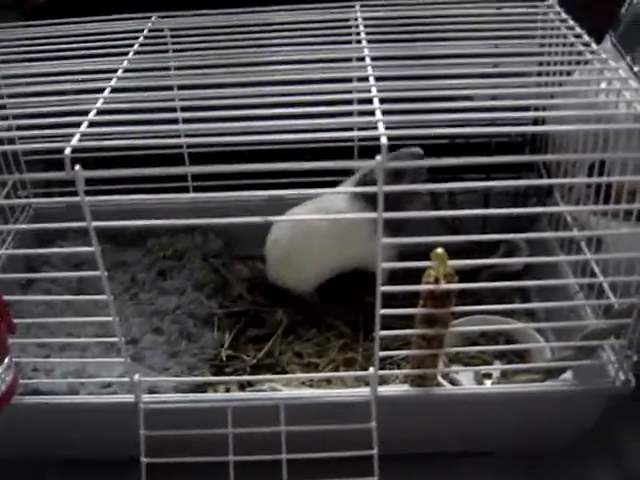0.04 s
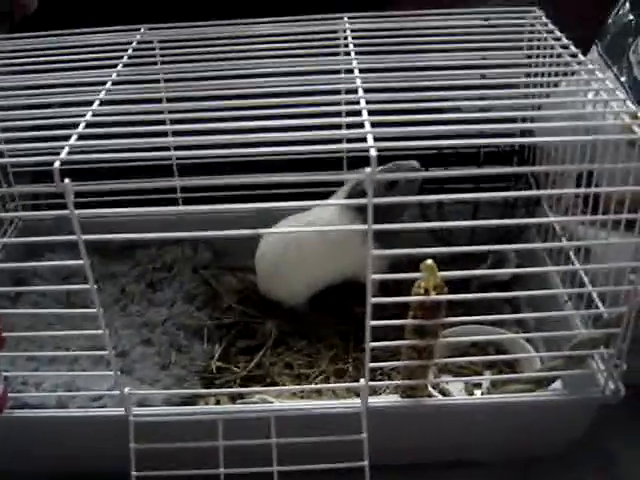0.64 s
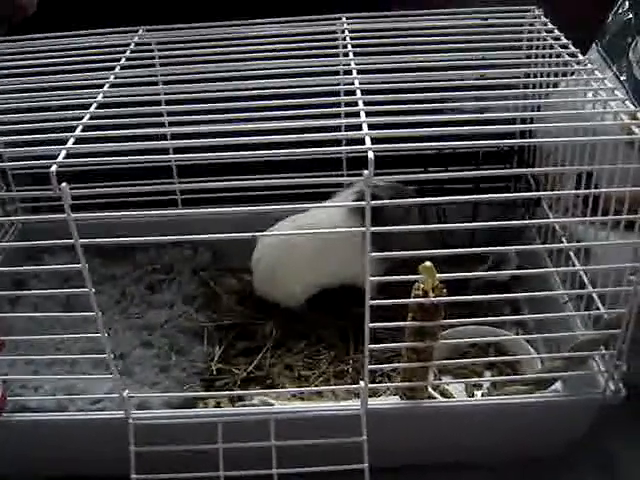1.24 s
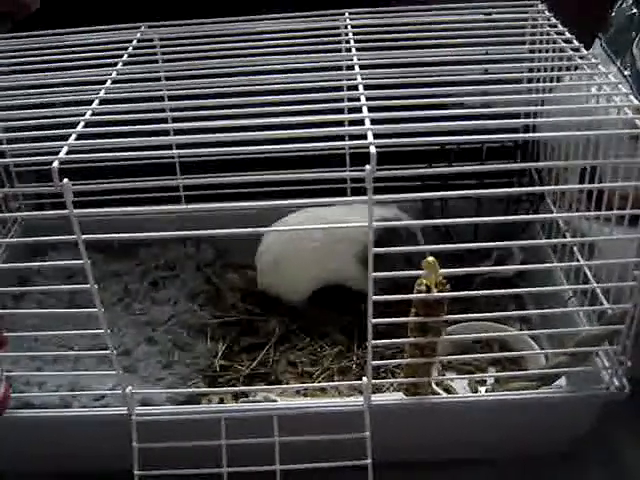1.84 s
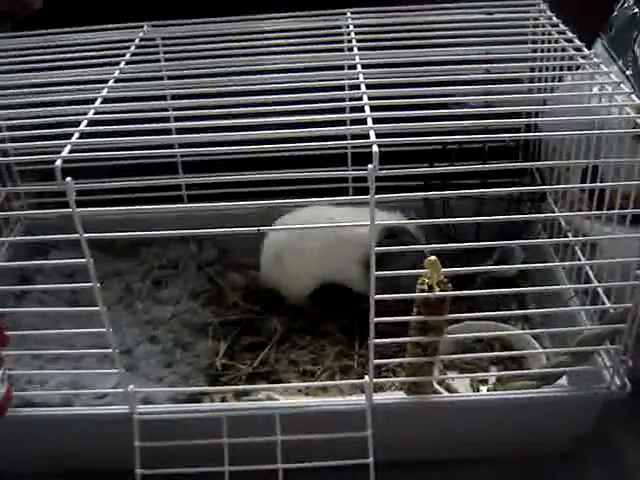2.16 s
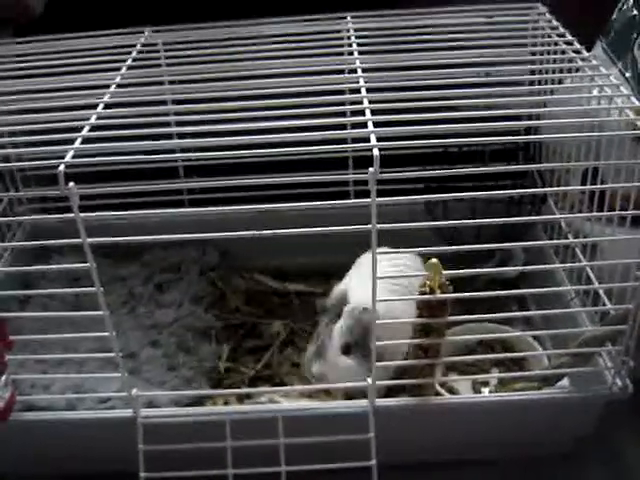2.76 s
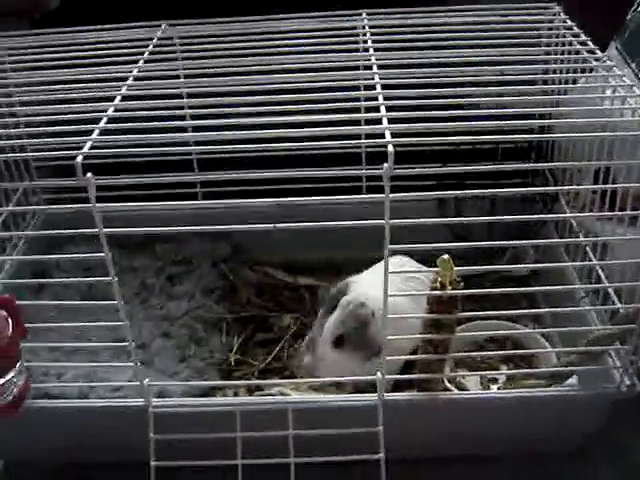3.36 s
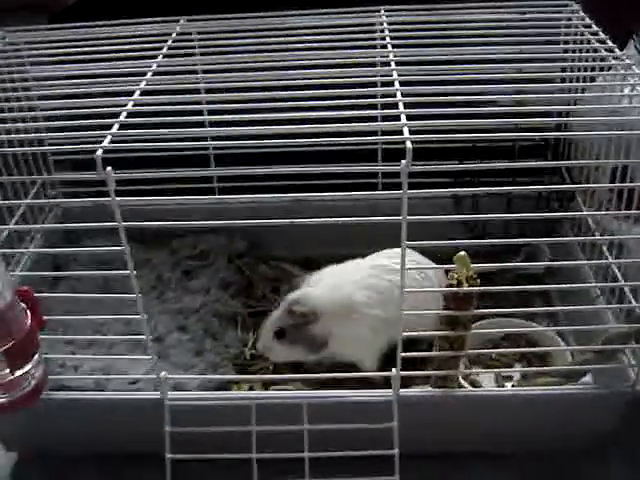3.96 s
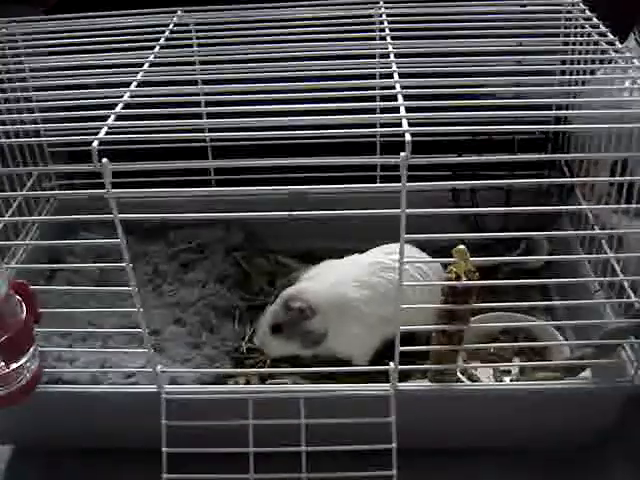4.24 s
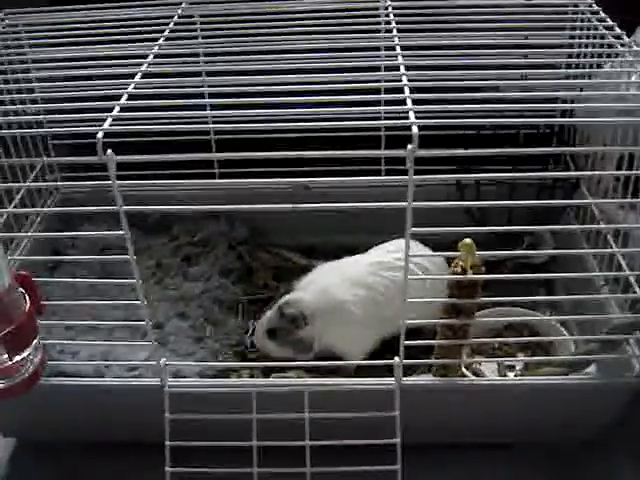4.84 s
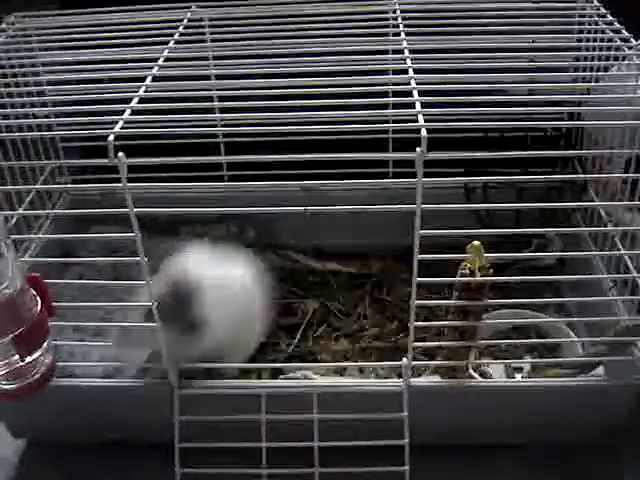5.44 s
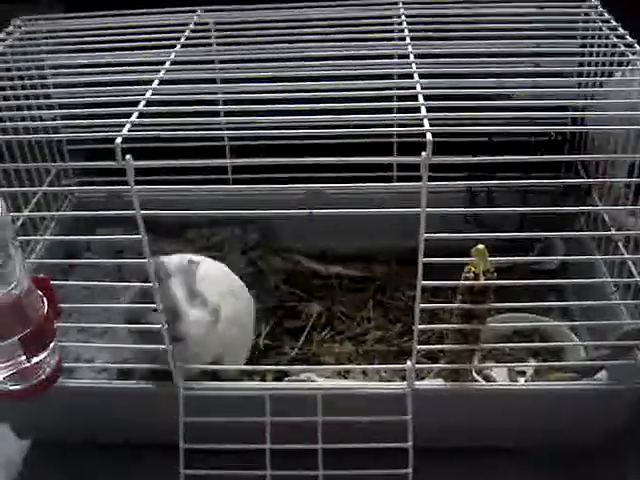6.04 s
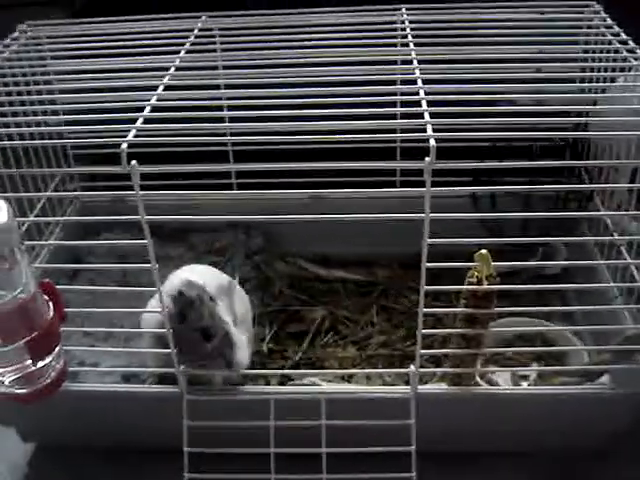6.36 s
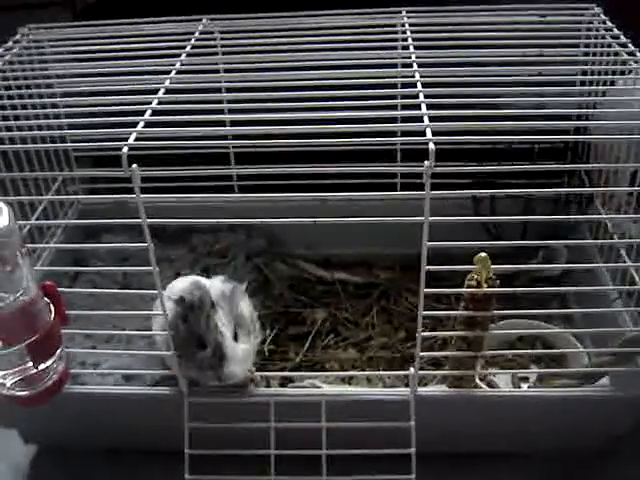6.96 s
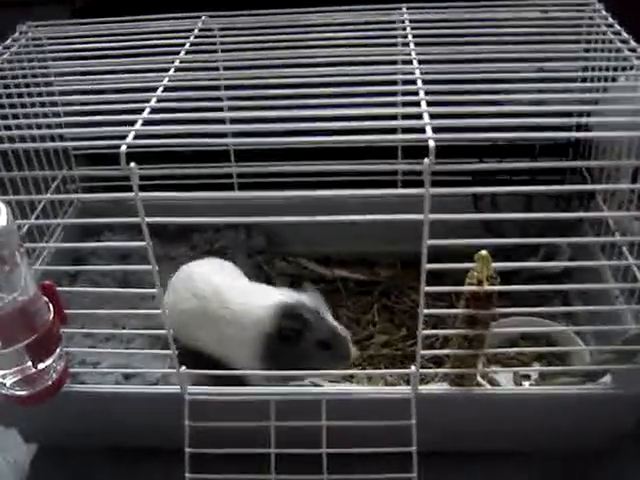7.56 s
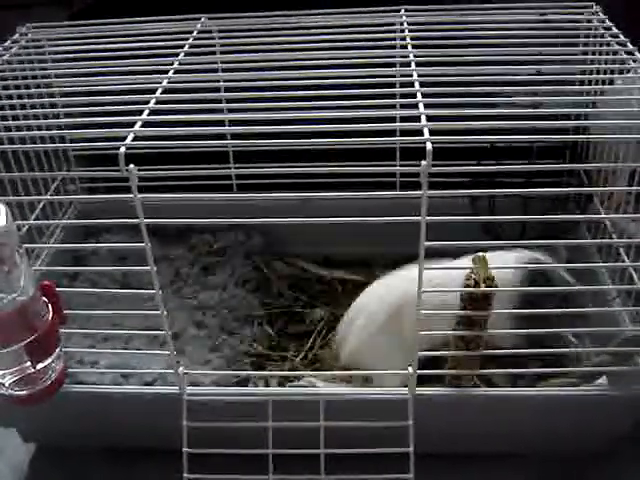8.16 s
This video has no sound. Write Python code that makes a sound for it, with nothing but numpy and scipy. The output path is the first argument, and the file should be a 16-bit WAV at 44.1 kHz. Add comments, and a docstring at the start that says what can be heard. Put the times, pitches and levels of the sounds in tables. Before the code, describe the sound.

A guinea pig chatters in its cage, giving two or three short clucks a second, many sliding up into high squeals at first. A little after two seconds it knocks sharply against the plastic tub and rustles the hay. Softer clucks follow, with a few faint stalk snaps, then a lighter bump and a quick scurry. A last squeal and scuffle come at the end. It sounds fairly close, in a small room with a steady hiss.

```python
"""A guinea pig chatters in a cage with a plastic tub, over the steady hiss of a small room.
From the start its vocal folds give clucks near 900 Hz; eager ones slide up to squeals near 3.5 kHz.
At 2.3 s it bumps the tub, which rings, and its feet rustle the hay. Softer clucks follow and a few
stalks snap. At 5.3 s comes a lighter bump and a dart across the hay; at 8 s a last squeal and scuffle."""
import sys
import numpy as np
from scipy import signal
from scipy.fft import rfft, irfft, next_fast_len
from scipy.io import wavfile

SR = 44100
rng = np.random.default_rng(int(sys.argv[2]) if len(sys.argv) > 2 else 0)


def unload_audio(sound):
    """Save the sound as a 16-bit wav file, at the path given as the first command line argument."""
    columns = np.transpose(np.atleast_2d(sound))
    # keep every value between -1 and 1, then stretch to whole-number steps
    steps = np.round(np.clip(columns, -1, 1) * 32767)
    wavfile.write(sys.argv[1], SR, steps.astype(np.int16))


N = 361619
TIME = np.arange(N) / SR


# Clucks: (start [s], length [s], opening pitch [Hz], opening level [dB], middle pitch [Hz],
# middle level [dB], overtone boost [dB], upturn length [s], upturn end pitch [Hz], upturn level [dB])
CLUCKS = [ (0.0, .02, 970, -35.5, 917, -45.5, 21, 0.0069, 900, -52),
          (0.125, 0.054, 1265, -40.5, 1004, -35.5, 4.5, 0.011, 1025, -43),
          (0.212, 0.0093, 1375, -50, 1325, -37.5, -4, 0.0056, 1350, -46),
          (0.388, 0.064, 1100, -45.5, 904, -39, 1.5, 0.077, 1963, -38.5),
          (0.789, 0.064, 1255, -38, 937, -36, 1, 0.087, 2133, -36.5),
          (1.254, 0.057, 1096, -44, 860, -38.5, 2.5, 0.041, 1604, -39.5),
          (1.635, 0.065, 1090, -47.5, 840, -36.5, -5.5, 0.028, 1152, -38),
          (2.137, .062, 1014, -40, 922, -34.5, -10, 0.026, 1470, -41.5),
          (2.417, .056, 1324, -23, 1008, -36, -3, 0.022, 1422, -24.5),
          (2.73, 0.072, 994, -44.5, 881.6, -38, 3, 0.038, 1235, -40),
          (3.164, 0.053, 968, -51, 825, -48.5, -2, 0.035, 1520, -41),
          (3.401, 0.046, 1067, -47.5, 828, -41.5, 1, 0.01, 856, -44),
          (3.761, 0.07, 911, -49, 775, -46.5, -4.5, 0.08, 1303, -48),
          (3.945, 0.027, 1150, -52, 1072, -51.5, 3, 0.0066, 1080, -48),
          (4.107, 0.073, 879, -46, 844, -42.5, -16, 0.016, 880, -60),
          (4.358, 0.056, 948, -49.5, 802, -44, -9.5, 0.036, 1261, -38),
          (4.623, 0.0555, 985, -41.5, 826, -40, -8.5, 0.0067, 850, -44),
          (4.782, 0.016, 1360, -52, 1213, -38.5, -10, 0.033, 1146, -46.5),
          (4.905, .073, 958, -50, 875, -47, -5, 0.021, 1617, -38.5),
          (5.15, 0.07, 893, -50, 840, -44, -9, 0.011, 1310, -37.5),
          (5.532, .088, 871, -43.5, 825, -38, -2.5, 0.014, 1376, -35.5),
          (5.87, 0.062, 906, -43.5, 788, -40.5, 0, 0.026, 1366, -43.5),
          (6.019, 0.046, 962, -56, 799, -47, 1, 0.073, 2200, -42),
          (6.297, 0.062, 1050, -44.5, 890, -37.5, 0, .04, 1396, -33),
          (6.523, 0.054, 854, -46.5, 893, -36, -1, 0.0063, 954, -34.5),
          (6.783, 0.05, 1010, -44.5, 868.4, -34, -1.5, 0.0048, 970, -40),
          (7.268, .049, 939, -46, 832, -43, -4, 0.015, 1400, -36),
          (7.371, 0.049, 1102, -42, 976, -41.5, -6.5, .036, 1947, -37.5),
          (7.681, 0.061, 953, -48, 903, -35.5, -4.5, 0.054, 1930, -45.5),
          (8.149, 0.043, 1100, -37, 945, -32.5, 2.5, .01, 940, -57), ]
# Squeals, one curve each: (time [s], pitch [Hz], level [dB], overtone boost [dB])
SQUEAL_CURVES = [
    [(.583, 2590, -42, 2), (.619, 3280, -28.5, -3), (.675, 3710, -29.5, 5), (.715, 3540, -39, 14)],
    [(.989, 2920, -38.5, 15), (1.01, 3140, -30, -1), (1.048, 3360, -30, -4), (1.067, 2065, -32, -4),
     (1.085, 1632, -38.5, 2.5), (1.121, 1990, -33, -2), (1.145, 3270, -31, -5), (1.163, 3180, -48, 0)],
    [(1.436, 1646, -38, 10.5), (1.451, 1825, -39, 6.5), (1.49, 2205, -39.5, -5)],
    [(1.765, 1286, -38.5, 4), (1.825, 1485, -45.5, -14), (1.835, 1900, -39, 13), (1.872, 1990, -43.5, 11),
     (1.913, 2530, -46, -10), (1.944, 2560, -46.5, 17), (1.974, 1630, -36.5, -11), (1.992, 1672, -45, 0),
     (2.01, 2460, -45, 3)],
    [(2.246, 2850, -46.5, 27), (2.268, 3590, -32, 10), (2.294, 3780, -22.5, 8), (2.322, 4000, -25.5, 12),
     (2.352, 3680, -27, 1)],
    [(2.513, 1658, -50, 3), (2.548, 1710, -36, 14), (2.569, 2790, -41, 1), (2.584, 3163, -25.5, 1),
     (2.612, 3460, -27.5, 3), (2.644, 3360, -31, 3)],
    [(2.95, 1293, -40.5, 1.5), (2.99, 1274, -37, -4)],
    [(4.469, 1705, -54, -9), (4.493, 1560, -38.5, -7)],
    [(5.26, 1207, -37, -6)],
    [(5.656, 1402, -31.5, 1), (5.707, 1586, -32, -13.5), (5.722, 1915, -35.5, -2)],
    [(7.495, 2405, -51.5, 7), (7.54, 2380, -44, 4), (7.548, 2720, -39, -8), (7.565, 2670, -38, -6)],
    [(7.835, 2335, -48.5, 2), (7.909, 2810, -45.5, -4), (7.96, 2560, -50.5, 7), (7.99, 2960, -44, -2),
     (8.014, 3240, -32, -4), (8.032, 3694, -25, -4), (8.085, 3920, -35, -4)],
]

def calls():
    """One contour per call; a squeal continues the cluck begun just before it."""
    contours = [cluck_contour(*row) for row in CLUCKS]
    starts = [row[0] for row in CLUCKS]
    for squeal in SQUEAL_CURVES:
        k = np.searchsorted(starts, squeal[0][0]) - 1
        contours[k] = np.vstack([contours[k], squeal])
    return [rows[np.argsort(rows[:, 0])] for rows in contours]


def cluck_contour(start_s, length_s, opening_hz, opening_db, mid_hz, mid_db, boost_db,
                  turn_s, end_hz, turn_db, sag_share=.6, lift_share=.0509):
    """Pitch sags, lifts, turns up: (time [s], pitch [Hz], level [dB], overtone boost [dB])."""
    progress = np.linspace(0, 1, num=11)
    sag = np.maximum(1 - progress / sag_share, 0) ** 2
    lift = np.maximum((progress - sag_share) / (1 - sag_share), 0) ** 2
    hz = mid_hz * (1 + lift_share * lift) + (opening_hz - mid_hz) * sag
    db = mid_db + (opening_db - mid_db) * sag - .5 * lift
    cluck = np.transpose([start_s + length_s * progress, hz, db, boost_db + 4.5 * sag])
    upturn = [(start_s + length_s + .58 * turn_s, hz[-1] + .68 * (end_hz - hz[-1]), turn_db, boost_db),
              (start_s + length_s + turn_s, end_hz, turn_db + .5, boost_db)]
    return np.vstack([cluck, upturn])


# Voice cracks: (start [s], end [s], half-pitch line level [dB])
VOICE_CRACKS = [(1.355, 1.415, 3.5), (1.779, 1.834, 17), (2.824, 2.986, 2), (3.841, 3.922, 11),
                (4.417, 4.453, 3), (5.633, 5.698, -15)]
# Throat response: (frequency [Hz], gain [dB])
THROAT_RESPONSE = [(350, -34), (720, -10.5), (1300, 8), (1800, -2.5), (2400, -7), (3900, -3), (4600, -12),
                   (5600, -13.5), (7300, -12), (10000, -10.5)]
# Mouth resonance, moved by the jaw: (time [s], frequency [Hz])
MOUTH_TRACK = [(0.42, 2780), (0.92, 3370), (1.29, 3000), (1.44, 3060), (1.85, 3570), (2.9, 3110),
               (3.42, 2880), (5.2, 2610), (5.57, 3150), (6.33, 2700), (6.375, 3200), (6.4, 2700),
               (7.3, 2600), (7.72, 3360), (8.17, 3100)]

def voice(harmonics=10, octave_db=-7.5, mouth_db=9, mouth_width_hz=330, attack_s=.0015, release_s=.0037,
          clear_jitter=.004, glide_jitter=.017, hoarse_jitter=.032, glide_quaver=.034, shimmer_db=2.5):
    """Vocal-fold harmonics, coloured by throat and mouth, least steady in mid-glide."""
    out = np.zeros(N)
    shake, quaver = wobble(rate_hz=400), wobble(rate_hz=70)
    shimmer = from_db(shimmer_db * wobble(rate_hz=79))
    rasp = from_db(-47) * colour(rng.standard_normal(N), THROAT_RESPONSE)
    multiple = np.arange(1, 2 * harmonics + 1)[:, None] / 2
    flutter = 1.5 * np.array([wobble(rate_hz=30) for _ in multiple])
    for call in calls():
        s, hz, db, boost_db = np.transpose(call)
        on = (TIME > s[0] - attack_s) & (TIME < s[-1] + release_s)
        t = TIME[on]
        pitch_hz = np.exp(np.interp(t, s, np.log(hz)))
        level = from_db(np.interp(t, s, db))
        mid_glide = np.interp(pitch_hz, [983, 1365, 2580, 3360], [0, 1, 1, 0])
        cracking = np.clip([np.minimum(t - a, b - t) / release_s for a, b, _ in VOICE_CRACKS], 0, 1)
        # cracking or barely driven folds vibrate unevenly
        hoarse = np.maximum(cracking.sum(axis=0) / 2, np.interp(db.mean(), [-48, -42], [1, 0]))
        jitter = clear_jitter + glide_jitter * mid_glide + hoarse_jitter * hoarse
        pitch_hz *= 1 + jitter * shake[on] + (clear_jitter + glide_quaver * mid_glide) * quaver[on]
        phase = 2 * np.pi * np.cumsum(pitch_hz) / SR
        lines_hz = multiple * pitch_hz
        # half multiples sound only in a crack
        halves = np.where(multiple % 1, from_db(np.array(VOICE_CRACKS)[:, 2]) @ cracking, 1)
        # pressing lifts overtones in the throat's pass band; those above it are weaker
        in_band = np.interp(lines_hz, [4200, 5200], [1, 0])
        press_db = np.interp(t, s, boost_db) * (multiple > 1) * in_band
        slope_db = octave_db * np.log2(np.maximum(multiple, 1)) - 4 * (multiple > 2) * (1 - in_band)
        formant_db = mouth_db / (1 + ((lines_hz - curve(MOUTH_TRACK, t)) / mouth_width_hz) ** 2)
        flutter_db = flutter[:, on] * (1.5 + mid_glide)
        gains = gain_at(THROAT_RESPONSE, lines_hz) * halves * (lines_hz < SR / 2)
        gains *= from_db(slope_db + press_db + formant_db + flutter_db)
        tone = (gains * np.sin(multiple * phase)).sum(axis=0) / np.sqrt((gains ** 2).sum(axis=0) / 2)
        gate = np.interp(t, [s[0] - attack_s, s[0], s[-1], s[-1] + release_s], [0, 1, 1, 0])
        # air noise grows more slowly than the tone: soft calls are raspiest
        out[on] += (tone * level + rasp[on] * np.sqrt(level)) * gate * shimmer[on]
    return out


def throat_ring(hz=1300, t60_s=.041, over_onset_db=3.5):
    """The sudden opening of each call after the first rings the lowest throat resonance."""
    openings = np.zeros(N)
    for call in calls()[1:]:
        s, _, db, _ = np.transpose(call)
        openings[round(s[0] * SR)] = from_db(db[:2].mean() + over_onset_db)
    return ring(openings, hz, t60_s)


# Blows on the tub: (time [s], level [dB])
TUB_BLOWS = [(2.3217, -14.5), (5.342, -27)]
# Plastic tub modes: (frequency [Hz], level [dB], t60 [s])
TUB_MODES = [(195.5, -24.5, 0.22), (277, -20.5, 0.028), (556, -4, 0.033), (698, -5, 0.028),
             (842, -17.5, 0.13), (1286, -3, 0.024), (1447, -22, 0.023)]

def tub_bumps(rattle_db=-8, rattle_t60_s=.082):
    """A blow rings the tub and shakes its bedding."""
    out = np.zeros(N)
    for s, db in TUB_BLOWS:
        blow = signal.unit_impulse(N, round(s * SR))
        rattle = colour(burst(s, rattle_t60_s), HAY_SPECTRUM)
        modes = sum((-1) ** k * from_db(mode_db) * ring(blow, hz, t60_s)
                    for k, (hz, mode_db, t60_s) in enumerate(TUB_MODES))
        out += from_db(db) * (modes + from_db(rattle_db) * rattle / np.abs(rattle).max())
    return out


# Hay rustling on the tub: (frequency [Hz], density [dB])
HAY_SPECTRUM = [(40, -27.5), (130, -21.5), (290, -3.5), (410, -10.5), (560, -5.5), (1350, -8.5),
                (2200, -15), (4000, -18.5), (10000, -33)]
# Feet in the hay: (start [s], attack [s], hold [s], level [dB], t60 [s])
FOOT_SCUFFLES = [(2.443, 0.056, .01, -43.5, 0.29), (5.302, .004, 0.017, -35.5, 0.052),
                 (5.312, 0.033, 0.033, -31, 0.23), (5.42, 0.1, 0.11, -50, 0.43),
                 (8.113, 0.018, 0.027, -44.5, 0.21)]

def scuffles(contacts_per_s=1300, spread_db=5.5, split_hz=1000):
    """Tiny contacts of feet and hay thump the tub or crackle in the stalks."""
    thumps, crackles = (rng.random((2, N)) < contacts_per_s / SR) * rng.choice([-1, 1], (2, N))
    strength = from_db(spread_db * np.clip(rng.standard_normal(N), -2, 2))
    low, high = (signal.butter(2, split_hz, side, fs=SR, output="sos") for side in ("low", "high"))
    grains = signal.sosfilt(low, thumps * strength) + signal.sosfilt(high, crackles * strength)
    return colour(grains, HAY_SPECTRUM) * sum(swell(*row) for row in FOOT_SCUFFLES)


# Stalks snapping and scraping: (time [s], peak level [dB], resonance [Hz], t60 [s])
STALK_SNAPS = [(0.3483, -33, 3000, 0.011), (2.995, -43.5, 5860, 0.091), (3.628, -38.5, 2130, 0.19),
               (5.907, -39, 5840, 0.15), (6.064, -41.5, 6000, 0.12), (7.126, -39.5, 1960, 0.02)]

def stalk_snaps(stalk_t60_s=.0026):
    """A short crack through the broad resonance of a dry stalk."""
    out = np.zeros(N)
    for s, db, hz, t60_s in STALK_SNAPS:
        crack = ring(np.diff(burst(s, t60_s), prepend=0), hz, stalk_t60_s)
        out += from_db(db) * crack / np.abs(crack).max()
    return out


# Reflections from tub and wall: (delay [s], gain [dB])
REFLECTIONS = [(.0031, -25), (0.0123, -11)]

def room(x, gap_s=.0088, t60_s=.21, dull_hz=6000, tail_db=-7):
    """Direct sound, near reflections and a short diffuse tail."""
    near = sum(from_db(db) * np.interp(TIME - delay_s, TIME, x, left=0) for delay_s, db in REFLECTIONS)
    tail = signal.sosfilt(signal.butter(1, dull_hz, fs=SR, output="sos"), burst(gap_s, t60_s)[:SR])
    tail /= np.sqrt(np.sum(tail ** 2) * SR / (2 * dull_hz))
    return x + near + from_db(tail_db) * signal.fftconvolve(x, tail)[:N]


# Room noise: (frequency [Hz], density [dB])
HISS_SPECTRUM = [(25, -17), (100, -5), (300, 2.5), (500, -0.5), (1200, -4), (2500, -6.5), (7700, -11.5),
                 (7920, -3), (8150, -12), (10000, -19.5)]

def room_hiss(level_db=-55.5):
    """Steady noise with a narrow peak near 7.9 kHz."""
    return from_db(level_db) * colour(rng.standard_normal(N), HISS_SPECTRUM)


def from_db(db):
    """Decibels to gain."""
    return 10 ** (np.asarray(db) / 20)


def rms_one(x):
    """Scale to unit power."""
    return x / np.sqrt(np.mean(x ** 2) + 1e-20)


def curve(rows, t):
    """Straight lines through (time [s], value) rows."""
    return np.interp(t, *np.transpose(rows))


def gain_at(spectrum, hz):
    """Gain of a (frequency [Hz], level [dB]) spectrum at hz."""
    points_hz, db = np.transpose(spectrum)
    return from_db(np.interp(np.log(hz + 1e-9), np.log(points_hz), db))


def colour(x, spectrum):
    """Shape by a spectrum; unit power."""
    size = next_fast_len(N)
    gains = gain_at(spectrum, np.fft.rfftfreq(size, 1 / SR))
    return rms_one(irfft(rfft(x, size) * gains, size)[:N])


def wobble(rate_hz):
    """Low-passed noise; unit power."""
    return rms_one(signal.sosfilt(signal.butter(2, rate_hz, fs=SR, output="sos"), rng.standard_normal(N)))


def ring(x, hz, t60_s):
    """One mode: a unit click rings a decaying unit sine."""
    r, w = from_db(-60 / (t60_s * SR)), 2 * np.pi * hz / SR
    return signal.lfilter([0, np.sin(w)], [1, -2 * r * np.cos(w), r * r], x + 1e-18)


def burst(start_s, t60_s):
    """Noise: instant onset, exponential decay."""
    age = TIME - start_s
    return rng.standard_normal(N) * (age >= 0) * from_db(-60 * np.abs(age) / t60_s)


def swell(start_s, attack_s, hold_s, db, t60_s):
    """Envelope: rise, hold, decay."""
    age = TIME - start_s
    decay_db = 60 * np.maximum(age - attack_s - hold_s, 0) / t60_s
    return np.clip(age / attack_s, 0, 1) * from_db(db - decay_db)


def scene(voice_db=-2.0):
    """The animal in its cage over the room noise."""
    cage = from_db(voice_db) * (voice() + throat_ring()) + tub_bumps() + stalk_snaps() + scuffles()
    return (room(cage) + room_hiss())[None]


def record(dry):
    """Steep low-pass."""
    cutoff_hz = 10150
    return signal.sosfilt(signal.ellip(12, .1, 80, cutoff_hz, fs=SR, output="sos"), dry)


dry = scene()
out = record(dry)
unload_audio(out)
```